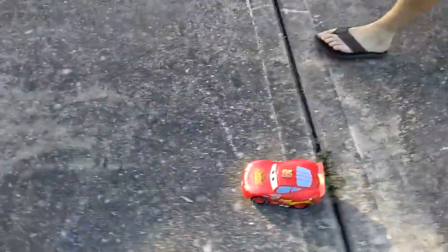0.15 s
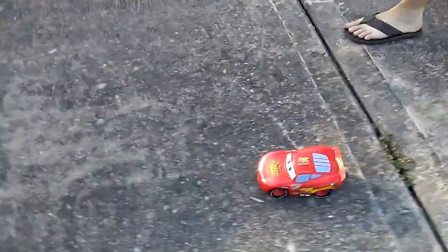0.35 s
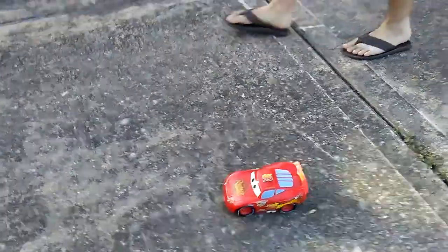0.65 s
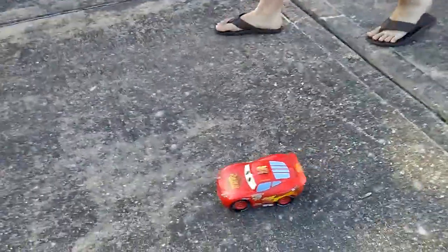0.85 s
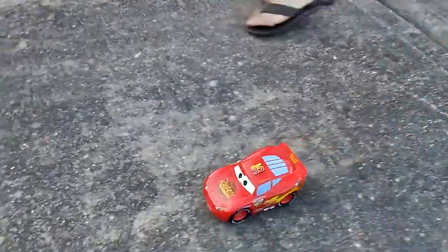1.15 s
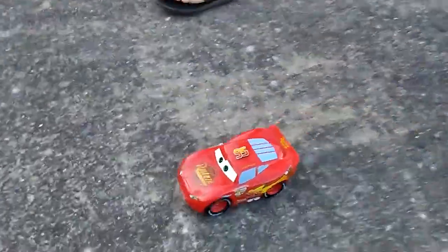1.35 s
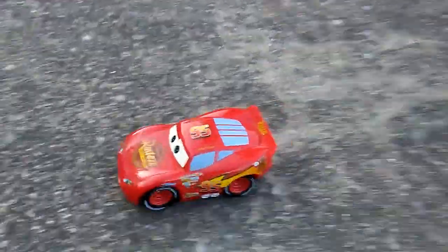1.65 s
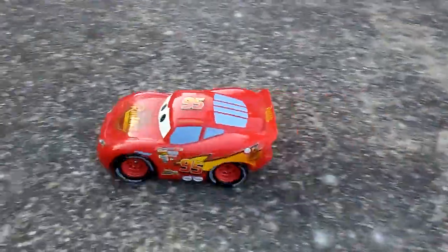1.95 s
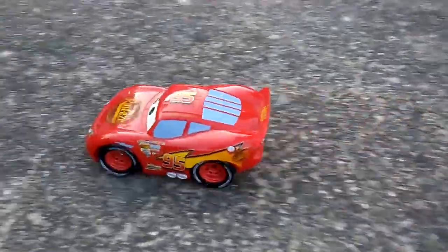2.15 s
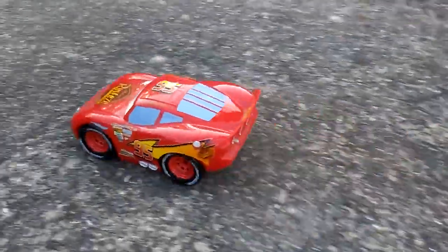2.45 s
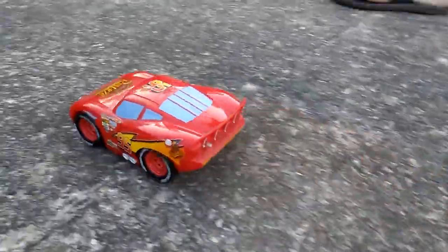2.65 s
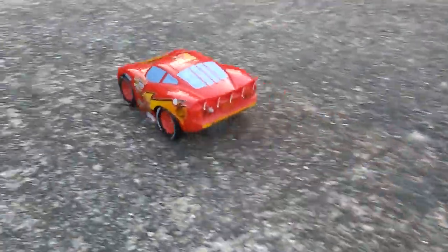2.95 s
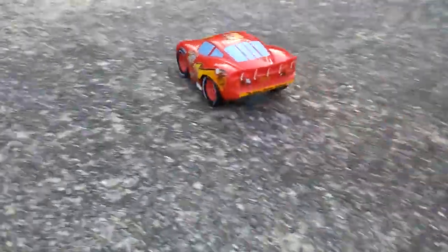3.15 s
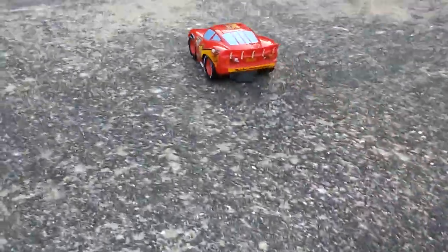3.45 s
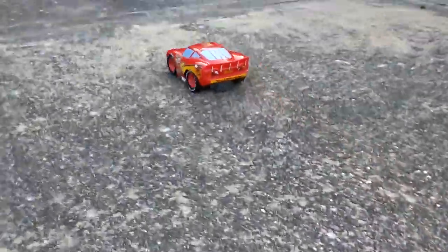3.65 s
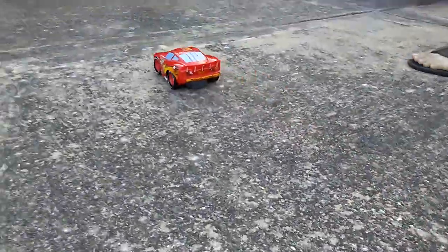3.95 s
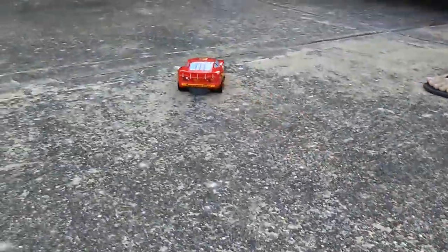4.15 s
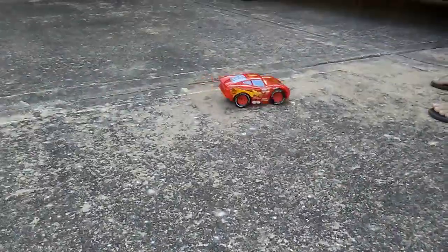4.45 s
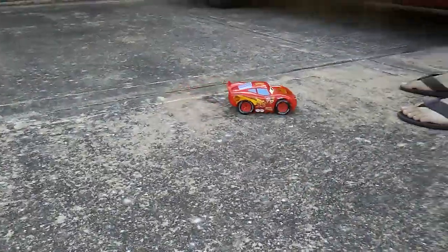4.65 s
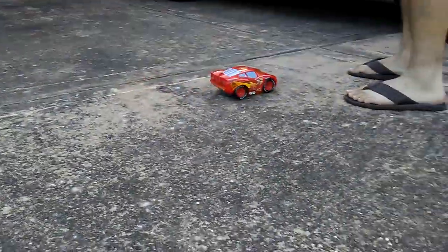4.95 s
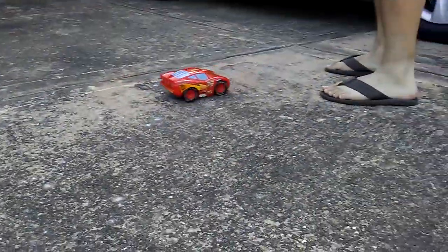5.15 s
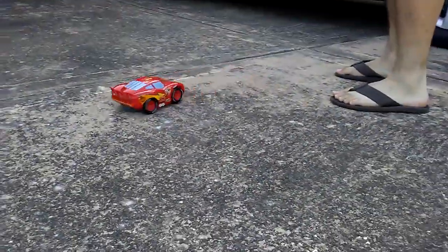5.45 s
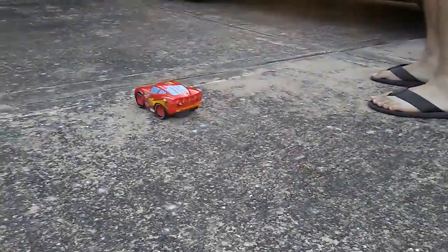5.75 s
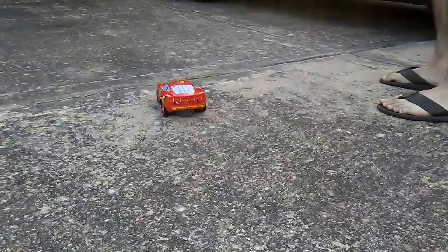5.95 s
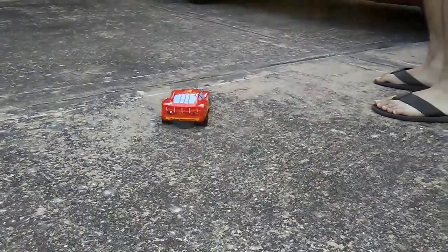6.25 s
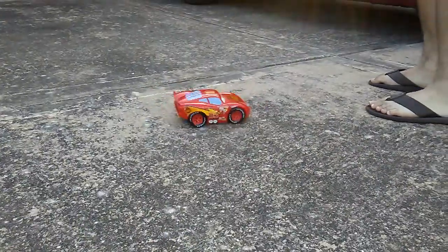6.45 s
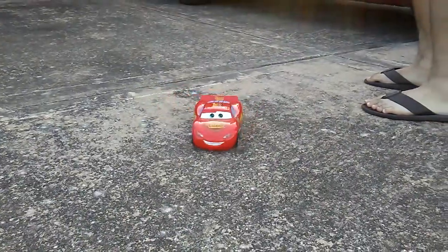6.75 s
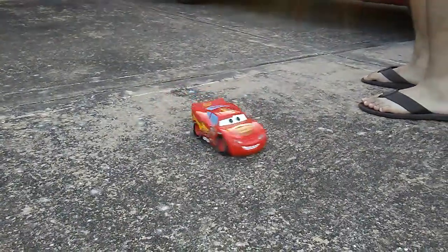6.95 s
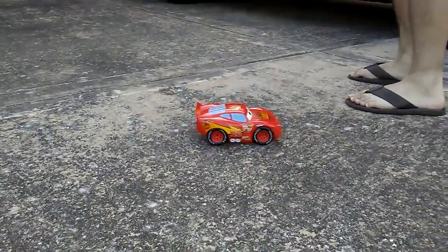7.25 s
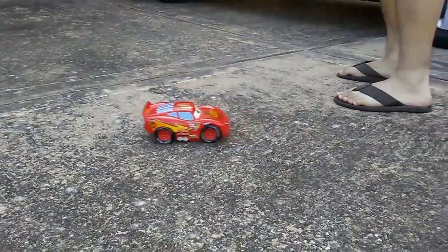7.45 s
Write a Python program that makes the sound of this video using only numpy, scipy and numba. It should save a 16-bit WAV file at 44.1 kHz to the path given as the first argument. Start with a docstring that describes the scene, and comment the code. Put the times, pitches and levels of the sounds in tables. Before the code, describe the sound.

Hollow plastic rattle and gritty rolling of a motorized toy car on outdoor concrete, with thin gear whine, sharp jolts and low wind thumps.

```python
"""Hard plastic wheels clatter over rough concrete: a battery toy car close to a hand-held phone outdoors.
Each lump of grit and each jolt rings the hollow shell, the gearbox and the loose parts as resonances.
Puffs of air thump the microphone as decaying slow cycles, over flutter and steady shaped background noise.
A gear whine, smeared tones following the motor's speed, is heard on the long run and in short swells."""
import sys
import numpy as np
from scipy import signal
from scipy.fft import rfft, irfft
from scipy.io import wavfile
from scipy.ndimage import uniform_filter1d, map_coordinates
from numba import njit

SR = 44100
rng = np.random.default_rng(int(sys.argv[2]) if len(sys.argv) > 2 else 0)


def to_wav(s):
    """Save 16-bit WAV."""
    ch = np.atleast_2d(s).T  # columns
    pcm = np.round(np.clip(ch, -1, 1) * 32767)  # PCM
    wavfile.write(sys.argv[1], SR, pcm.astype(np.int16))


N = 335139
TIME_S = np.arange(N) / SR

# All levels are relative, ahead of the phone's gain and rounding.
# Rolling level of each part, nearest at 2.4 s: [time_s, shell_db, gearbox_db, rattle_db]
ROLLING = [(0, -32, -26.5, -29), (.25, -31, -20, -24.5), (.5, -29.5, -27.5, -27), (.9, -28, -31.5, -27),
           (1.1, -25.5, -24.5, -23.5), (1.35, -30.5, -25.5, -26.5), (1.6, -25, -23, -24.5),
           (1.75, -22, -19, -18), (2.4, -21, -17.5, -14.5), (3, -22, -17, -17.5), (3.5, -30, -20.5, -22.5),
           (3.95, -34.5, -24, -22.5), (4.3, -29, -17.5, -20.5), (4.9, -28.5, -24.5, -28),
           (5.2, -27, -33, -37), (5.5, -34, -24, -29), (5.8, -32, -25.5, -28), (6.3, -34, -29, -24),
           (6.85, -24.5, -22, -24), (7.2, -28, -27.5, -32.5), (7.45, -32.5, -27, -32),
           (7.6, -27.5, -20, -28.5)]
# Larger jolts: [peak_s, shell_db, rattle_db]
JOLT_BLOWS = [(0.044, -26.5, -13.5), (0.11, -18, -45), (0.129, -19, -19), (0.154, -13.5, -15),
              (0.227, -17, -16.5), (0.331, -23, -23), (0.408, -18.5, -64), (0.504, -19, -40),
              (0.656, -35, -21), (0.708, -20, -34), (0.809, -28, -29), (0.846, -23, -42), (0.934, -22, -41),
              (0.964, -27, -28.0), (1.135, -26, -42), (1.236, -32, -22), (1.735, -28, -9),
              (1.809, -12, -35), (1.91, -15.0, -12), (1.95, -14, -8), (2.062, -24, -8), (2.118, -18, -45),
              (2.146, -18.5, -14), (2.26, -20, -49), (2.316, -12, -32), (2.346, -25, -9),
              (2.416, -10.5, -13), (2.488, -15.5, -28), (2.527, -23.5, -15), (2.564, -16, -29),
              (2.666, -15, -19), (2.714, -34, -24), (2.756, -39, -7), (2.863, -10.5, -50), (3.07, -25, -37),
              (3.132, -16, -28), (3.385, -21, -31), (3.419, -33, -13), (3.52, -47, -16),
              (3.564, -20.5, -18), (3.653, -23, -11.5), (3.795, -25, -14.5), (3.877, -22.0, -58),
              (3.929, -66, -17), (4.055, -26, -16), (4.176, -30, -36), (4.274, -23, -20), (4.377, -26, -15),
              (4.516, -21, -51), (4.584, -33.0, -16), (4.654, -18, -39), (4.687, -21, -57),
              (4.859, -41, -22), (4.986, -23, -42), (5.012, -23, -31), (5.145, -46, -30), (5.444, -43, -22),
              (5.52, -31, -12.5), (5.543, -32, -20), (5.702, -18, -47), (5.748, -17, -12),
              (5.814, -21, -27), (5.889, -50, -16), (6.029, -18.5, -7), (6.059, -25, -42),
              (6.381, -32, -21), (6.543, -23, -13.5), (6.573, -12, -6), (6.59, -38, -17),
              (6.656, -20.0, -27.0), (6.835, -35, -14), (6.858, -25, -22), (6.879, -26, -45),
              (7.146, -16.5, -22), (7.165, -16, -21.5), (7.233, -17.5, -18), (7.279, -19.5, -27.5),
              (7.305, -27, -39)]
# Modes of the hollow plastic shell: [centre_hz, width_hz, level_db]
SHELL_MODES = [(666, 173, -1.5), (412, 104, -16), (277, 167, -24.5), (731.3, 82.7, 2.5), (867, 183, -6)]
# Modes of the gearbox: [centre_hz, width_hz, level_db]
GEARBOX_MODES = [(1769, 107, 3), (1356, 75, -3.5), (2713, 690, -8), (3173, 120, -3), (1896, 1670, -4.5)]
# Modes of the loose parts: [centre_hz, width_hz, level_db]
RATTLE_MODES = [(5623, 500, 3.5), (3854, 47, 1), (5010, 5300, -4), (8150, 320, 8), (9130, 95, -1.5),
                (9060, 1340, -2), (12600, 390, -9), (8400, 8500, -5.5), (11150, 1500, -5)]
# Spectral tilt as the car turns other sides: [time_s, shell_db_per_oct, gearbox_db_per_oct, rattle_db_per_oct]
FACING_TILT = [(0, -10, 2.5, -0.5), (.9, -4, 12.5, -6), (2.1, 0, -6.5, -9.5), (3.4, -0.5, 4, -5.5),
               (4.3, 3.5, -6, -5.5), (5.2, -3.5, -2.5, 1), (6.3, 1, 3.5, -7), (6.8, -2.5, 5, 1),
               (7.5, 1, -18, 8)]
# Car checks, stops or reverses; nominal drop, time from end of stop until each part is back:
# [start_s, drop_db, shell_back_s, gearbox_back_s, rattle_back_s]
HALT_DROPS = [(0.253, 8, 0.051, 0.016, 0.015), (4.53, 5, 0.23, 0.39, 0.12), (4.699, 11, 0.21, 0.095, 0.1),
              (5.006, 20, 0.47, 0.078, 0.17), (5.564, 8, 0.2, 0.11, 0.097), (5.905, 4, 0.12, 0.044, 0.12),
              (6.07, 16.5, 0.12, 0.037, 0.19), (6.3, 16.5, 0.15, 0.039, 0.04), (6.894, 14, 0.17, 0.23, 0.2),
              (7.33, 3.5, 0.19, 0.039, 0.1)]
# Share of the time back that each part stays down: [shell, gearbox, rattle]
STAND_SHARE = (0.15, 0.55, 0.31)
# Time to fall in a halt: [shell_s, gearbox_s, rattle_s]
STOP_TIME_S = (.02, .02, .033)
# Echo off the concrete: [time_s, notch_hz, echo_db]
CONCRETE_ECHO = [(0, 7400, -7), (1, 6800, -5.5), (2.2, 6800, -9.5), (3.6, 6573, -4), (4.6, 6980, -14),
                 (7, 7200, -11.5)]
# Spectrum of the outdoor background, humps near 120 Hz and 1.8 kHz: [freq_hz, density_db_per_hz]
BACKGROUND_SPECTRUM = [(45, -5), (60, -5), (118, 10), (438, -17.5), (706, -15), (896, -7), (1790, 5.5),
                       (3590, -12.5), (9110, -9.5), (16000, -39)]
# Flutter between puffs: [time_s, level_db]
BREEZE_LEVEL = [(0, -33), (.4, -26), (1.6, -40), (2.6, -35.5), (3.3, -41), (7.6, -43)]
# Puffs on the microphone: [start_s, level_db, swing_hz]
AIR_PUFFS = [(0.109, -12, 78.6), (0.321, -11, 80.7), (0.37, -11, 61.9), (0.44, -3, 81), (0.459, -2.5, 66),
             (0.863, -23, 67.3), (1.643, -17, 56.5), (2.449, -11, 51.1), (2.488, -14.5, 72),
             (2.538, -12, 56.5), (2.599, -11, 68.4), (2.828, -15, 52)]
# Gear whine on the long run: [time_s, pitch_hz, level_db]
RUN_WHINE = [(1.3, 2103, -38), (1.45, 2119, -31), (2.7, 2152, -24), (3.7, 2104, -29.5), (3.98, 2070, -29.5),
             (4.05, 2058, -23), (4.55, 2092, -22.5), (4.62, 2010, -41)]
# Short swells of gear whine, climbing to the held pitch where they start lower:
# [start_s, first_hz, length_s, level_db]
WHINE_SWELLS = [(5.083, 1735, 0.25, -32), (5.664, 1290, 0.3, -31), (6.114, 1419, 0.21, -35),
                (6.342, 1751, 0.31, -22.5), (6.962, 1089, 0.11, -35), (7.288, 1690, 0.4, -26)]

NARROW_HZ = 640  # narrower modes ring mostly on blows, wider ones hiss on
BLOW_RISE_S, SPREAD_S, COLOUR_DB = .003, .0015, 3  # spread: each mode's own moment and strength in a jolt
ROCK_DB, SLOW_BEND = .8, .35
SKIPS_PER_S, SKIP_JITTER_S, SKIP_S, SKIP_SCATTER_DB = 38, .004, .006, 1.5
CLIMB_HZ_PER_S, TURNING_HZ = 3400, 1803  # climb rate in a swell; pitch held in tight turns
SWELL_SHARE, FADE_DB = .29, 6  # peak position in a swell; depth at both its ends
SMEAR_HZ, STUTTER_DB, THROB_HZ, THROB_DB = 60, 3, 40, 2.5
BACKGROUND_DB, TOP_HZ = -36, 15650


def undb(db):
    """Decibels to amplitude."""
    return 10 ** (np.asarray(db) / 20)


def unit(x):
    """Scale to rms 1."""
    return x / np.sqrt(np.mean(x ** 2))


def curve(table, column):
    """One table column joined by straight lines in time."""
    table = np.array(table)
    return np.interp(TIME_S, table[:, 0], table[:, column])


def drift(points_per_s):
    """Slow chance: random levels joined smoothly, rms 1."""
    step = int(SR / points_per_s)
    levels = np.repeat(rng.standard_normal(N // step + 1), step)
    return unit(uniform_filter1d(levels, step)[:N])


def bursts(times_s, sizes, rise_s, fall_s):
    """Sum of envelopes with a rounded rise and exponential fall, each peaking at its time."""
    impulses = np.bincount(np.clip((times_s * SR).astype(int), 0, N - 1), sizes, N)
    t = np.arange(int(.04 * SR)) / SR
    shape = (1 - np.exp(-(t / rise_s) ** 2)) * np.exp(-t / fall_s)
    peak = shape.argmax()
    return signal.oaconvolve(impulses, shape / shape.max())[peak:][:N]


def skips():
    """Wheel pressure: landings on hard wheels fill the time between jolts at a loose rate."""
    at_s = np.concatenate([[0], np.array(JOLT_BLOWS)[:, 0], [N / SR]])
    per_gap = np.maximum(np.round(np.diff(at_s) * SKIPS_PER_S), 1)
    counted = np.concatenate([[0], np.cumsum(per_gap)])
    chance = rng.standard_normal((400, 2))[:int(counted[-1])]
    times_s = np.interp(np.arange(len(chance)), counted, at_s) + SKIP_JITTER_S * chance[:, 0]
    return unit(bursts(times_s, undb(SKIP_SCATTER_DB * chance[:, 1]), SKIP_S, SKIP_S))


def halts(column):
    """Drop in dB of one part: a quick fall, a standstill, an uneven pick-up."""
    drop_db, stop_s = np.zeros(N), STOP_TIME_S[column - 1]
    for row in HALT_DROPS:
        start_s, db, back_s = row[0], row[1], max(row[1 + column], .01)
        down_s = start_s + stop_s
        corners_s = [start_s, down_s, down_s + STAND_SHARE[column - 1] * back_s, down_s + back_s]
        drop_db = np.maximum(drop_db, np.interp(TIME_S, corners_s, [0, db, db, 0]))
    return uniform_filter1d(drop_db, int(stop_s * SR)) * (1 + .18 * drift(25.0))


@njit
def sway(x, hz, width_hz):
    """Moving resonance: two equal state-variable band-passes in series, gain 1 at the centre."""
    y, b, l, c, m = np.empty(len(x)), 0., 0., 0., 0.
    for i in range(len(x)):
        g, k = np.tan(np.pi * hz[i] / SR), width_hz / hz[i]
        v = (b + g * (x[i] - l)) / (1 + g * (g + k))
        b, l = 2 * v - b, l + 2 * g * v
        w = (c + g * (k * v - m)) / (1 + g * (g + k))
        c, m = 2 * w - c, m + 2 * g * w
        y[i] = k * w
    return y


def part(modes, column, jolt_db, grit, press, tap, steady, scatter_db, lag_s, rise_s, fall_s, flex, blow_s):
    """One part: grit and jolts push noise bursts into its modes; each blow favours other modes."""
    at_s = np.array(JOLT_BLOWS)[:, 0]
    lump_s, lump_size = grit.T
    rolling = undb(curve(ROLLING, column) - halts(column)) * press
    tilt_db_per_oct = curve(FACING_TILT, column)
    # hard taps ring all modes together
    strike = np.bincount(((at_s - .002) * SR).astype(int), undb(jolt_db), N)
    strike = strike + rolling * np.bincount((lump_s * SR).astype(int), lump_size, N)
    out = 0
    for hz, width_hz, db in modes:
        own = rng.standard_normal((len(grit), 2))
        luck = rng.standard_normal((len(at_s), 2))
        # lumps are answered early or late, more or less strongly
        lump_push = bursts(lump_s + lag_s * own[:, 0], lump_size * undb(scatter_db * own[:, 1]),
                           rise_s, fall_s)
        push = steady * min(width_hz / NARROW_HZ, 1) + lump_push
        blow = bursts(at_s + SPREAD_S * luck[:, 1], undb(jolt_db + COLOUR_DB * luck[:, 0]),
                      BLOW_RISE_S, blow_s)
        # the body rocks and flexes
        scratch = unit(push) * rolling * undb(ROCK_DB * drift(2.993)) + blow
        force = scratch * rng.standard_normal(N) + tap * strike
        bent_hz = hz * (1 + flex * (SLOW_BEND * drift(1.505) + drift(40.0)))
        gain = undb(db + tilt_db_per_oct * np.log2(hz / modes[0][0]))
        out = out + gain * sway(force, bent_hz, float(width_hz))
    # level the part by the noise power its modes pass
    power = sum(undb(2 * db) * width_hz for _, width_hz, db in modes) * np.pi / SR / 2
    return out / np.sqrt(power)


def car(press, lumps_per_s=120, even=.5, size_db=2.0):
    """All parts feel the same loosely spaced lumps in the concrete: many small, a few large."""
    chance = rng.exponential(size=(1500, 2))
    lump_s = np.cumsum(even + (1 - even) * chance[:, 0]) / lumps_per_s
    grit = np.column_stack([lump_s, undb(size_db * np.minimum(chance[:, 1], 2.6))])
    grit = grit[grit[:, 0] < N / SR]
    knock_db, clatter_db = np.array(JOLT_BLOWS)[:, 1:].T
    gear_db = (knock_db + clatter_db) / 2 - 4.0  # gearbox answers from both
    shell = part(SHELL_MODES, 1, knock_db, grit, press, tap=13.35, steady=1.6, scatter_db=3.0,
                 lag_s=.003, rise_s=.0033, fall_s=.0039, flex=.0087, blow_s=.0017)
    gears = part(GEARBOX_MODES, 2, gear_db, grit, press, tap=1.9, steady=1.0, scatter_db=4.0,
                 lag_s=.0034, rise_s=.0016, fall_s=.0084, flex=.021, blow_s=.011)
    rattle = part(RATTLE_MODES, 3, clatter_db, grit, press, tap=4.3, steady=.96, scatter_db=3.0,
                  lag_s=.0019, rise_s=.0022, fall_s=.0025, flex=.006, blow_s=.003)
    return shell + gears + rattle


def mirrored(x):
    """Direct sound plus late concrete echo: comb dips at the notch pitch, a third of it and above."""
    late_s = 3 / 2 / curve(CONCRETE_ECHO, 1)  # 1.5 periods of the notch pitch
    echo = map_coordinates(x, [(TIME_S - late_s) * SR], mode="nearest")
    return x + undb(curve(CONCRETE_ECHO, 2)) * echo


def background():
    """Steady outdoor background noise, shaped in frequency with humps near 120 Hz and 1.8 kHz."""
    hz = np.arange(N // 2 + 1) * SR / N + 1
    freq_hz, density_db = np.array(BACKGROUND_SPECTRUM).T
    db = np.interp(np.log(hz), np.log(freq_hz), density_db)
    return unit(irfft(rfft(rng.standard_normal(N)) * undb(db), N)) * undb(BACKGROUND_DB)


def ring(x, hz, width_hz):
    """One fixed resonance, gain 1 at its centre."""
    return signal.lfilter(*signal.iirpeak(hz, hz / width_hz, fs=SR), x)


def wind(t60_s=.11):
    """Each puff swings the membrane for a few slow cycles; a soft flutter lies between."""
    flutter = unit(ring(ring(rng.standard_normal(N), 49.0, 45.0), 54.0, 275.0))
    out = flutter * undb(curve(BREEZE_LEVEL, 1) + 2.0 * drift(5.9))
    t = TIME_S[:SR // 4]
    envelope = (1 - np.exp(-t / .00044)) * 1000 ** (-t / t60_s)
    for start_s, db, hz in AIR_PUFFS:
        i = int(start_s * SR)
        out[i:i + len(t)] += undb(db) * np.sin(2 * np.pi * hz * t) * envelope
    return out


def motor():
    """Pitch and gain of the gear mesh: the long run, then each short swell."""
    hz, gain = curve(RUN_WHINE, 1), undb(curve(RUN_WHINE, 2))
    for start_s, first_hz, length_s, db in WHINE_SWELLS:
        climb_hz = np.minimum(first_hz + CLIMB_HZ_PER_S * (TIME_S - start_s), TURNING_HZ)
        hz = np.where(TIME_S >= start_s, climb_hz, hz)
        along = (TIME_S - start_s) / length_s
        active = (along > 0) * (along < 1)
        below_db = FADE_DB * np.interp(along, [0, SWELL_SHARE, 1], [1, 0, 1]) ** 2
        gain = gain + active * undb(db - below_db)
    return hz, gain


def whine(ratio=1.31, second_db=-6.5, upper=1.55, upper_db=-10.5):
    """Three gear pairs mesh unevenly: stuttering tones smeared into narrow bands, following the motor."""
    hz, gain = motor()
    phase = 2 * np.pi * np.cumsum(hz) / SR
    # an off-centre gear throbs, never quite evenly
    throb_hz = THROB_HZ * (1 + .17 * drift(2.5))
    throb_db = THROB_DB * np.sin(2 * np.pi * np.cumsum(throb_hz) / SR)
    pole = np.exp(-np.pi * SMEAR_HZ / SR)
    out = 0
    for turns, db in ((phase, 0), (ratio * phase, second_db), (upper * phase, upper_db)):
        wobble = signal.lfilter([1], [1, -pole], rng.standard_normal((2, N)))
        tone = wobble[0] * np.cos(turns) + wobble[1] * np.sin(turns)
        tone = tone * undb(throb_db + STUTTER_DB * drift(50.0))
        out = out + undb(db) * unit(tone)
    return out * gain


def scene(airborne=1.5):
    """Sum at one microphone; grit noise and whine slacken while the wheels are off the ground."""
    press = unit(airborne + skips())
    return (mirrored(car(press)) + background() + wind() + press * whine())[None]


def record(dry):
    """The phone drops the deepest bass, dulls the top octave, rounds the highest peaks and cuts the top."""
    dry = signal.sosfilt(signal.butter(3, 40.0, "high", fs=SR, output="sos"), dry)
    dry = signal.sosfilt(signal.butter(2, 13500.0, fs=SR, output="sos"), dry)
    rounded = np.tanh(.9 * dry) / 1.63
    return signal.sosfilt(signal.ellip(10, .2, 80, TOP_HZ, fs=SR, output="sos"), rounded)


dry = scene()
out = record(dry)
to_wav(out)
```